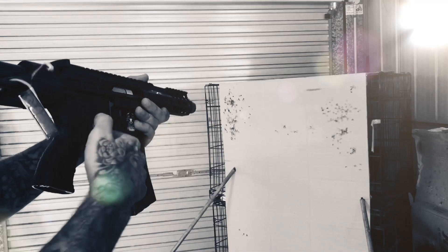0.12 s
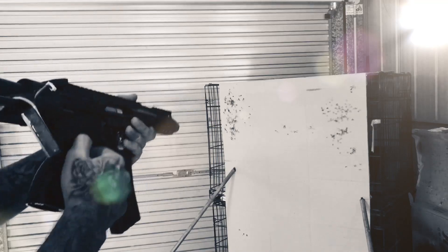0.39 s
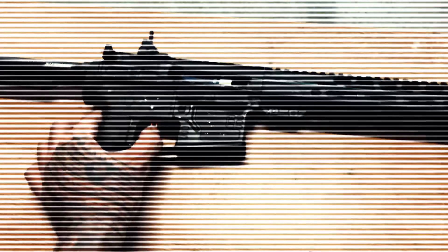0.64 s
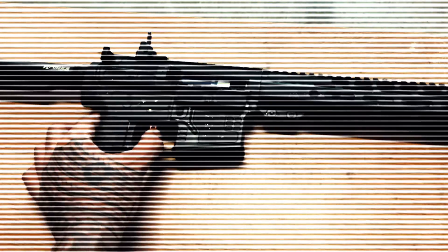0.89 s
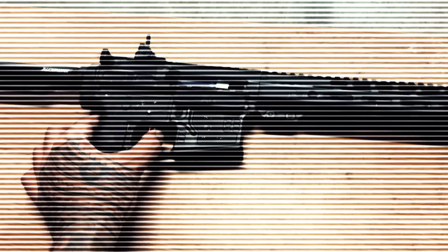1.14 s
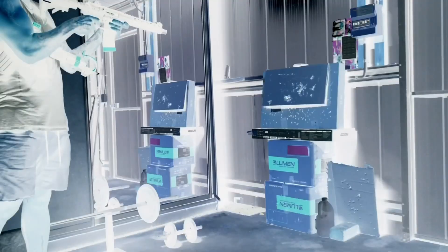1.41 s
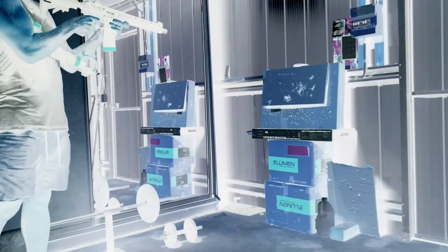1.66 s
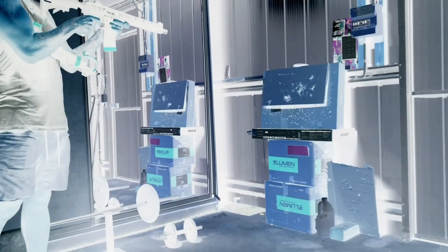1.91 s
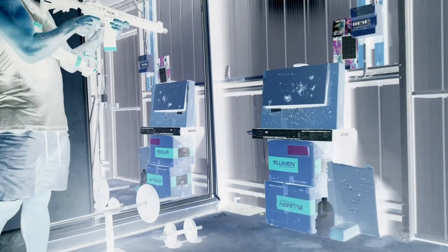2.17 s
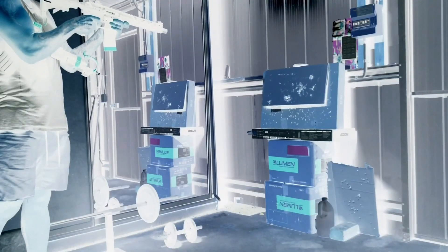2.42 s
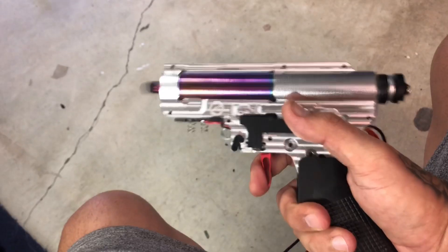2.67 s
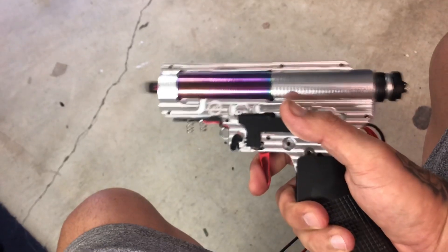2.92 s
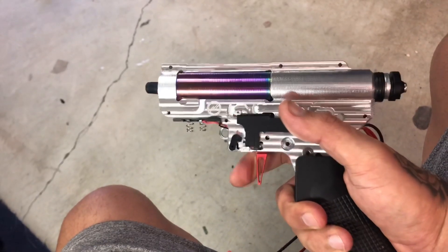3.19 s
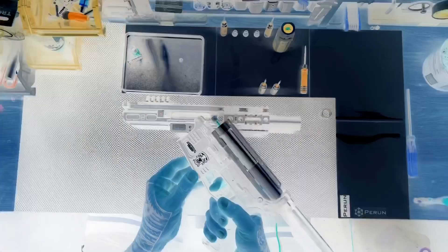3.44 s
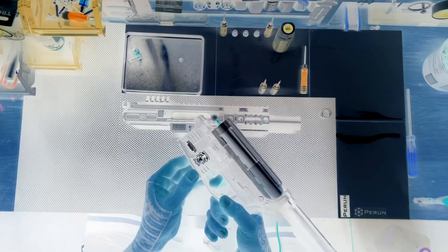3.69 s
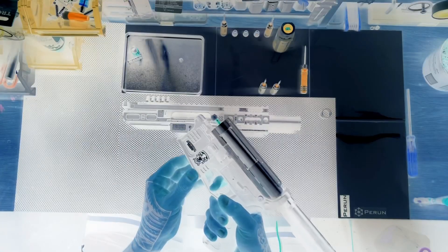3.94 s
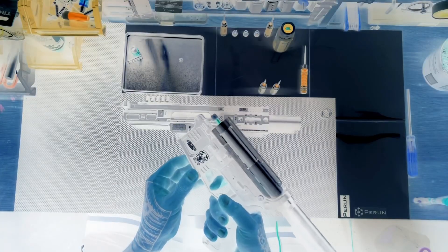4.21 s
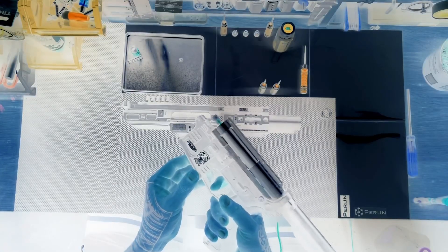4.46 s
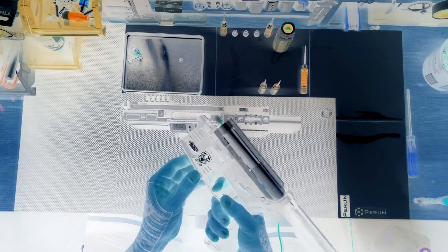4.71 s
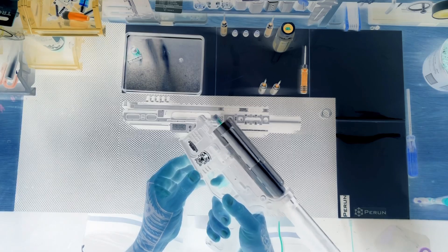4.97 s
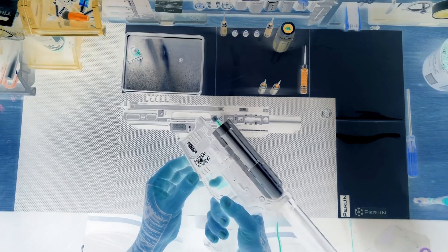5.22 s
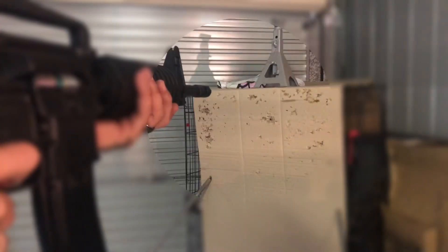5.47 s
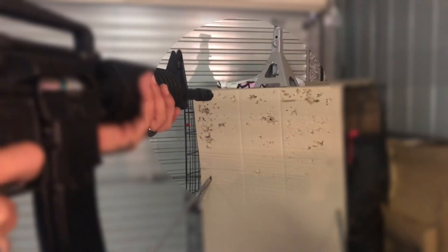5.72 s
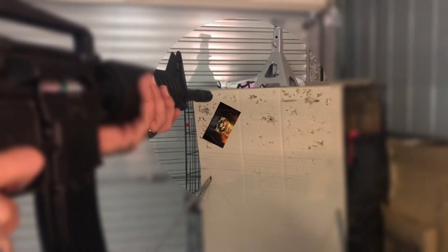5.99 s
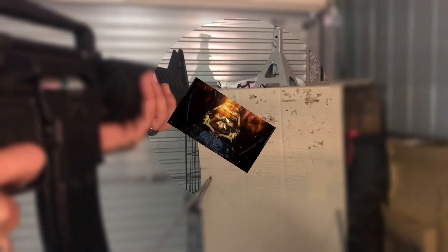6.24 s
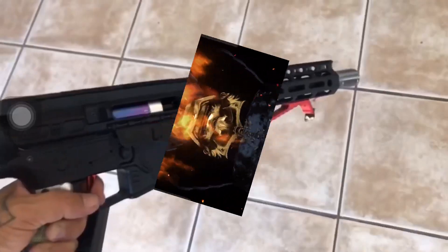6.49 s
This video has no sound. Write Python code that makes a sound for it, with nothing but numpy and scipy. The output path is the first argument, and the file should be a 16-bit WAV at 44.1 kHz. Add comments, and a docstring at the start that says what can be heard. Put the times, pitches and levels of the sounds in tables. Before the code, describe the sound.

Seven electric toy blasters follow one another in hard-walled sheds, very close to the microphone. A slower five-shot burst, a faster rattle, a long dense burst, another fast one, then about fifteen single shots and more bursts. Each cycle is a piston thud and airy crack, then a gear click and rough whirr. Echoes ring until abrupt cuts.

```python
"""Seven hard-walled sheds or garages, joined by hard cuts, an electric toy blaster in each, close to one microphone.
Every cycle the spring piston slams the cylinder head: a repeating thud under a partly new crack of air noise.
A gear catches the rack with a click and whirrs, as rough noise, while it draws the piston back.
In three of the rooms gel balls burst on cardboard as short noise cracks.
Decaying noise is each room's answer, which rings on after the last cycle until the next cut."""
import sys
import numpy as np
from scipy import signal
from scipy.fft import rfft, irfft, next_fast_len
from scipy.io import wavfile
from scipy.ndimage import uniform_filter1d

SR = 44100
rng = np.random.default_rng(int(sys.argv[2]) if len(sys.argv) > 2 else 0)


def volts_from_db(level):
    """Convert decibel levels to linear amplitude ratios."""
    exponent = np.asarray(level, float) / 20
    return 10 ** exponent


def pcm_store(signal):
    """Save signal as 16-bit PCM."""
    levels = np.round(np.clip(np.atleast_2d(signal), -1, 1) * 32767)
    wavfile.write(sys.argv[1], SR, levels.astype(np.int16).T)


N = 291942

# Each blaster's slam colour, as a list of points. Each point: frequency in Hz, relative level in dB per Hz.
SLAM_COLOURS = [
    [(50, -31), (119, -33), (237, 2), (316, -9), (407, -8), (628, -7), (809, -3.5), (1080, -4.5),
     (1610, -16), (1790, -24), (3440, 1), (4270, -6), (6130, -4), (15700, -15)],
    [(50, -46), (133, -29), (245, -18), (340, -13), (506, -8), (606, -11), (676, -1.5), (753, 0.5),
     (1500, -14.5), (1930, -1), (2310, -13), (3440, -25.5), (10900, -16.5), (15700, -20)],
    [(50, -14), (340, -7.5), (506, 2.5), (726, -12), (902, 0.5), (1120, -1), (1300, -19), (1550, -0.5),
     (1730, 5.5), (2150, -17), (2390, -26), (7620, -9), (9810, -18), (15700, -16)],
    [(50, -28), (407, -2.5), (726, -12.5), (870, 2.5), (1120, -7), (1340, 1.5), (1860, -13), (2770, -4),
     (3440, -10.5), (4120, -7), (5120, -13.5), (5700, -11), (6590, -12.5), (15700, -11)],
    [(50, -35), (184, -10), (454, -27.5), (1080, 1), (1440, -4), (1670, -0.5), (2150, -4.5), (3080, -2.5),
     (4270, -0.5), (4430, -8.5), (5700, 0.5), (6590, -4), (11300, -4.5), (15700, -5.5)],
    [(50, -30), (340, -2.5), (488, -8.5), (628, 1), (839, -13), (1080, -3), (1250, -21), (1500, -0.5),
     (1930, -19), (2230, -5), (2870, -2), (4120, -11), (8190, -12.5), (15700, -16)],
    [(50, -34), (177, -23), (340, -14.5), (471, -15.5), (606, 2), (700, 3), (809, -3), (970, -20),
     (1440, -14.5), (2000, -8), (2230, -9), (3200, -11.5), (3830, -15), (15700, -23)],
]
# Each blaster's piston blow. Each row: upper edge of the repeating thud in Hz, thud lag in ms, thud level in dB,
# crack rise in ms, crack T60 in ms, share of the crack's power alike at each blow (0-1), crack level in dB.
PISTON_BLOWS = [(1190, 2.47, 27, 2.5, 25, 0.48, 10.5), (2430, 0.79, 23, 1, 12.7, 0.47, 8),
                (705, 2.13, 18.5, 1.5, 40, 0.15, 4.5), (1610, 2.494, 18.5, 0.57, 29, .2, 5.5),
                (870, 3.62, 27, 2.3, 17, 0.96, 12.5), (3520, 1.082, 24, 0.44, 24, 0.6, 6),
                (1120, 0.66, 20.5, 1, 33, 0.55, 7)]
# Each blaster's single piston rebound. Each row: lag after the thud in ms, level in dB re the thud.
PISTON_REBOUNDS = [(2.4, -3.5), (2.51, -13), (2.9, -12), (2.36, -12.5), (2.02, -11), (2.78, -14.5),
                   (3.63, -11)]


def slam(k, size, s, db):
    """The piston's head thuds alike at each blow and rebounds once; above it the air crack is partly new noise."""
    thud_hz, lag_ms, thud_db, rise_ms, crack_ms, alike, crack_db = PISTON_BLOWS[k]
    rebound_ms, rebound_db = PISTON_REBOUNDS[k]
    low, high = split_at(thud_hz)
    thuds = impulses(size, s + lag_ms / 1e3, db + thud_db)
    thuds += impulses(size, s + (lag_ms + rebound_ms) / 1e3, db + thud_db + rebound_db)
    spikes = impulses(size, s, db + crack_db)
    envelope = contact(crack_ms, rise_ms)
    crack = np.sqrt(alike) * spread(spikes, pattern(envelope))
    crack += np.sqrt(1 - alike) * spread(spikes, envelope) * rng.standard_normal(size)
    return coloured(thuds, SLAM_COLOURS[k], low) + coloured(crack, SLAM_COLOURS[k], high)


# Each blaster's gear and shell colour, as a list of points. Each point: frequency in Hz, relative level in dB per Hz.
WHIRR_COLOURS = [
    [(50, -25.5), (191, -5.5), (264, -6), (316, -8), (726, -2.5), (870, -4.5), (1010, -3.5), (1440, -4),
     (1610, -4.5), (1860, -4.5), (3080, -14), (3560, -13), (4940, -9), (15700, -18)],
    [(50, -15), (138, -13), (340, -7), (438, -25), (585, -6), (700, -18), (781, -42), (1200, -9),
     (1930, -1), (2230, -9), (3200, -10.5), (3560, -13), (7620, -14.5), (15700, -29)],
    [(50, -34), (237, -4), (340, -11), (471, -2), (839, -3.5), (935, -5), (1440, -6.5), (1550, -6.5),
     (1670, -0.5), (2770, -12), (7620, -15.5), (8800, -22), (13600, -20.5), (15700, -21.5)],
    [(50, -28), (294, -41), (454, -28), (544, -20), (676, -14.5), (1040, -9.5), (1860, -19), (2070, -8),
     (2390, -5.5), (2770, -10), (3080, 3), (3830, -13), (4120, -12), (15700, -14.5)],
    [(50, -43), (138, -14), (254, -10), (294, -4), (488, -17.5), (628, -1.5), (781, -4), (970, -3.5),
     (1550, -2), (1730, 3), (2230, -4), (3560, 2.5), (4430, 0.5), (15700, -5.5)],
    [(50, -16), (128, -8.5), (264, -6), (365, -0.5), (422, -2.5), (488, 4.5), (585, -6), (1160, 0.5),
     (1730, -6), (2070, -2.5), (2770, -11), (4940, -8.5), (12600, -12), (15700, -12.5)],
    [(50, -38), (159, -23), (220, -34), (284, -5), (454, -27.5), (544, -4.5), (676, -7.5), (935, -8.5),
     (1080, -15), (1670, -17), (2000, -2), (2230, -30), (2570, -11.5), (15700, -24.5)],
]
# Each blaster's gears. Each row: click lag in ms, click level in dB, draw lag in ms, draw length in ms,
# draw level in dB, free-running motor level in dB, tooth roughness in dB rms, edge in Hz below which cycles are alike.
GEAR_CYCLES = [(24.25, 0, 21, 33, -3.5, -15.5, 6, 330), (15.73, -1, 18, 14, -1, -17.5, 2.5, 1930),
               (13.1, -5.5, 12, 21, -4, -7.5, 3, 280), (17.94, 2.5, 12, 13, -8.5, -13, 2, 1500),
               (16.5, 2, 16, 31, -4, -20, 0.8, 1900), (8.09, -0.5, 16.94, 22.7, -2.5, -13, 4.5, 177),
               (13.08, -6, 16, 16, -6, -12, 0, 2400)]


def gears(k, size, s, db):
    """The gear catches the rack with a click and grinds under spring load; the motor whirrs on between."""
    click_ms, click_db, lag_ms, draw_ms, draw_db, motor_db, rough_db, alike_hz = GEAR_CYCLES[k]
    click, catch, draw = (round(ms * SR / 1e3) for ms in (click_ms, lag_ms, draw_ms))
    cycle = np.full(catch + draw, volts_from_db(motor_db))
    cycle[catch:] += volts_from_db(draw_db) * signal.windows.tukey(draw, .35)
    cycle[click:] += volts_from_db(click_db) * contact(12, rise_ms=0.27)[:len(cycle) - click]
    spikes = impulses(size, s, db)
    teeth = volts_from_db(rough_db * unit(uniform_filter1d(rng.standard_normal(size), size=90)))
    fresh = spread(spikes, cycle) * unit(teeth * rng.standard_normal(size))
    # the first tooth strikes cleanly, a little early or late
    struck = s + (click_ms + .4 * rng.standard_normal(len(s))) / 1e3
    strike_db = db + click_db + 9.5 + 1.2 * rng.standard_normal(len(s))
    fresh += impulses(size, struck, strike_db)
    low, high = split_at(alike_hz)
    alike = spread(spikes, pattern(cycle))
    return coloured(alike, WHIRR_COLOURS[k], low) + coloured(fresh, WHIRR_COLOURS[k], high)


# Gel balls on cardboard. Each row: blaster (from 0), flight in ms, flight scatter in ms, level in dB re the slam,
# level scatter in dB.
BALLS = [(0, 25, 8, -7, 3), (2, 16, 8, -8, 3), (5, 22, 7, -5, 3)]
# Colour of a bursting ball. Each point: frequency in Hz, relative level in dB per Hz.
SPLAT_COLOUR = [(200, -18), (700, 2), (2500, -7), (6000, 5), (15700, -5)]


def splats(k, size, s, slam_db):
    """Each gel ball bursts after its flight: a short crack of noise off the cardboard."""
    out = np.zeros(size)
    for _, flight_ms, scatter_ms, splat_db, scatter_db in (row for row in BALLS if row[0] == k):
        chance = rng.standard_normal((len(s), 2))
        landed = s + (flight_ms + scatter_ms * chance[:, 0]) / 1e3
        hits = impulses(size, landed, slam_db + splat_db + scatter_db * chance[:, 1])
        cracks = spread(hits, contact(15, rise_ms=0.27)) * rng.standard_normal(size)
        out += coloured(cracks, SPLAT_COLOUR)
    return out


# Short shell rings, mid to bright, one list per blaster. Each row: frequency in Hz, T60 in s, lag in ms,
# level in dB re the draw whirr, scatter in dB.
SHELL_RINGS = [
    [],
    [(1930, .014, 1, 9, 1), (3200, .02, 6, -2, 3), (2500, .02, 6, -3, 3)],
    [(1715, .05, 10, -3, 4)],
    [(3180, .02, 15, 5, 1.5), (3050, .02, 19, 4, 1.5)],
    [(5750, .01, 3, 5, 2), (3650, .012, 3, 4, 2), (3600, .015, 18, 2, 2)],
    [(2400, .008, 1, 8, 1.5), (3000, .008, 1, 9, 1.5)],
    [(620, .03, 1, 4, 1), (780, .025, 1, 1, 1), (1950, .015, 1, 0, 2)],
]


def shell(k, size, s, whirr_db):
    """The shell rings as brief damped tones once a cycle."""
    out = np.zeros(size)
    for hz, t60, lag_ms, db, scatter_db in SHELL_RINGS[k]:
        blow_db = whirr_db + db + scatter_db * rng.standard_normal(len(s))
        out += spread(impulses(size, s + lag_ms / 1e3, blow_db), ring(hz, t60)[:SR // 5])
    return out


# Low damped tones once a cycle; in the fifth blaster a dull thump after the slam. Each row: blaster (from 0),
# frequency in Hz, T60 in s, lag in ms, level in dB re the slam, scatter in dB.
LOW_TONES = [(1, 248, .6, 3, -33, 1), (2, 245, .3, 3, -28, 3), (4, 60, .07, 20, -32, 6),
             (5, 137, .9, 3, -35, 3)]


def low_tones(k, size, s, slam_db):
    """Some blasters sound a low damped tone once a cycle, so short in the fifth that it is a dull thump."""
    out = np.zeros(size)
    for _, hz, t60, lag_ms, db, scatter_db in (row for row in LOW_TONES if row[0] == k):
        tone_db = slam_db + db + scatter_db * rng.standard_normal(len(s))
        out += spread(impulses(size, s + lag_ms / 1e3, tone_db), ring(hz, t60))
    return out


# The hum of a stopping motor. The one row: start in seconds, frequency in Hz, T60 in s, level in dB.
STOPPING_MOTOR = (.817, 388, .26, -23)


def stop_note():
    """The second blaster hums a short damped note as its motor stops."""
    s, hz, t60, db = STOPPING_MOTOR
    return spread(impulses(N, [s], [db]), ring(hz, t60))


# Automatic bursts. Each row: first shot in seconds, shots, cycle in ms at the start, cycle in ms at the end,
# extra length of the first cycle in ms, timing scatter in ms.
AUTO_BURSTS = [(.0257, 5, 48.5, 48.5, 1.7, .8), (.4862, 12, 28.27, 28.27, 0, .05),
               (1.2218, 36, 32.5, 30.45, 3, 1), (2.5041, 23, 28.85, 29.02, 1.7, .05),
               (4.6026, 9, 48.9, 48.9, 3.7, .1), (5.276, 12, 36.45, 36.45, 2.6, .3),
               (5.9134, 12, 36.6, 36.3, 2.65, .3), (6.3408, 11, 26.5, 26.68, 0, .05)]
# Strength of each burst. Each row: first slam in dB, settled slam in dB, draw whirr in dB, scatter in dB.
BURST_STRENGTHS = [(-9, -13, -15.5, 0.7), (-14, -17, -24, 1.5), (-13, -11, -12, 2), (-13, -19.5, -23, 0.9),
                   (-14, -11.5, -19, 3), (-15, -9.5, -15, 1.5), (-12.5, -12.2, -16, 0.6),
                   (-14.5, -17, -21, 0)]


def automatic_bursts():
    """While the trigger is held the cycles repeat, their pace drifting and their slams easing to a settled strength."""
    settle_s = 0.12
    last_draw_db = -0.5  # the trigger lifts during the last draw
    rows = []
    for timing, strength in zip(AUTO_BURSTS, BURST_STRENGTHS):
        first, count, early, late, slow, scatter_ms = timing
        first_db, settled_db, whirr_db, scatter_db = strength
        cycles = np.linspace(early, late, count - 1)
        cycles[0] += slow
        since = np.r_[0, np.cumsum(cycles)] / 1e3
        chance = rng.standard_normal((count, 3))
        at = first + since + scatter_ms / 1e3 * chance[:, 0]
        slam_db = settled_db + (first_db - settled_db) * np.exp(-since / settle_s) + scatter_db * chance[:, 1]
        draw_db = whirr_db + scatter_db * chance[:, 2] + last_draw_db * (since == since[-1])
        rows.append(np.c_[at, slam_db, draw_db])
    return np.concatenate(rows)


# Single trigger pulls, nearly alike. Each entry: start in seconds.
SINGLE_PULLS = [3.4626, 3.548, 3.6302, 3.7161, 3.7963, 3.8767, 3.9572, 4.0306, 4.111, 4.1655, 4.2446, 4.3,
                4.365, 4.4449, 4.5027]


def single_pulls():
    """Each pull of the trigger fires one cycle of nearly the same strength."""
    slam_db, whirr_db, scatter_db = -12.5, -19, 0.75
    chance = scatter_db * rng.standard_normal((len(SINGLE_PULLS), 2))
    return np.c_[SINGLE_PULLS, chance + [slam_db, whirr_db]]


# Weaker cycles: one slam caught at a cut, others around the end and start of bursts.
# Each row: start in seconds, slam in dB, draw whirr in dB.
WEAKER_CYCLES = [(3.414, -16.5, -17.5), (5.7161, -33, -22.5), (5.754, -26, -28), (5.829, -38, -22),
                 (5.862, -17.5, -18), (5.8794, -20, -20)]


def shots():
    """Every cycle in time order, weaker ones included: start in seconds, slam in dB, draw whirr in dB."""
    rows = np.concatenate([np.array(WEAKER_CYCLES), automatic_bursts(), single_pulls()])
    return rows[np.argsort(rows[:, 0])]


# The seven rooms. Each row: level in dB of the low answer (300 Hz), of the high answer (8 kHz),
# T60 in s at 200 Hz, at 2 kHz, at 12 kHz, edge in Hz below which the answer is steady.
ROOM_ANSWERS = [(3, -1, 0.95, 0.85, 0.31, 300), (-2.5, -2.5, 0.45, 0.96, 0.36, 1500),
                (-2, 3.5, 0.56, 0.61, 0.3, 300), (-6, -2, 1, 0.86, 0.33, 1400),
                (2.5, -2.5, 0.29, 1, 0.35, 60), (-5, 0.5, 0.99, 0.83, 0.1, 300),
                (-9, -2, 0.84, 0.49, 0.37, 1500)]


def room(k, x):
    """Each frequency dies at its own speed; the treble of the answer shifts as the hand moves the blaster."""
    low_db, high_db, t60_low, t60_mid, t60_high, steady_hz = ROOM_ANSWERS[k]
    count, turn_s = 4, .04  # tails taken in turn, seconds from one to the next
    hz, t, z = signal.stft(rng.standard_normal((count, SR)), SR, nperseg=256)
    z[:, hz < steady_hz] = z[0, hz < steady_hz]
    t60 = along([(200, t60_low), (2000, t60_mid), (12000, t60_high)], hz)[:, None]
    level = volts_from_db(along([(300, low_db), (8000, high_db)], hz))[:, None]
    level = level / np.sqrt(t60 * SR / (2 * np.log(1000)))  # a longer tail holds no more energy
    tails = signal.istft(z * level * volts_from_db(-60 * t / t60), SR, nperseg=256)[1]
    place = (np.arange(len(x)) / SR / turn_s) % count
    answer = 0
    for i, tail in enumerate(tails):
        away = np.abs((place - i + count / 2) % count - count / 2)
        delayed = np.pad(tail, (300, 0))  # the walls answer 300 samples late
        answer = answer + spread(x * np.clip(1 - away, 0, 1), delayed)
    return answer


# The cuts into each blaster's room. Each row: start in seconds, cycles already fired before the cut.
ROOM_CUTS = [(0, 6), (.478, 1), (1.1812, 9), (2.497, 1), (3.4135, 0), (5.2575, 1), (6.325, 9)]


def blaster(k, fired):
    """One blaster close up and its room behind, from its cut to the next."""
    lead = SR // 2  # samples played ahead of the cut, then dropped
    start, earlier = ROOM_CUTS[k]
    end = ROOM_CUTS[k + 1][0] if k + 1 < len(ROOM_CUTS) else N / SR
    size = round(end * SR) - round(start * SR) + lead
    s, slam_db, whirr_db = np.transpose([row for row in fired if start <= row[0] < end])
    # cycles fired before the cut still fill the room
    before = s[0] - (s[1] - s[0]) * np.arange(earlier, 0, -1)
    s = np.r_[before, s] - start + lead / SR
    slam_db, whirr_db = (np.pad(v, (earlier, 0), "edge") for v in (slam_db, whirr_db))
    near = slam(k, size, s, slam_db) + gears(k, size, s, whirr_db)
    near += low_tones(k, size, s, slam_db) + splats(k, size, s, slam_db)
    # heard close up, too brief to stand out in the room
    shell_rings = shell(k, size, s, whirr_db)
    return (near + shell_rings + room(k, near))[lead:]


def hush():
    """A faint, mostly low noise lies under everything."""
    return volts_from_db(-66) * coloured(rng.standard_normal(N), [(60, 13), (1500, -7), (6000, -40), (16000, -42)])


TOP_HZ = 15800  # nothing is kept above this


def unit(x):
    """x at rms 1."""
    return x / np.sqrt(np.mean(x ** 2) + 1e-20)


def along(points, hz):
    """(Hz, value) points read off on a log axis."""
    f, v = np.transpose(points)
    return np.interp(np.log(hz + 1), np.log(f + 1), v)


def coloured(x, spectrum, share=lambda hz: 1):
    """x through the causal filter of that spectrum, at mean power gain 1 before the share is taken."""
    m = 2 * next_fast_len(len(x) // 2 + 4096)
    hz = np.fft.rfftfreq(m, 1 / SR)
    gain = unit(volts_from_db(along(spectrum, hz)) * (hz < TOP_HZ)) * share(hz)
    # folding the cepstrum forward in time gives minimum phase
    cepstrum = irfft(np.log(gain + 1e-4), m)
    cepstrum[1:m // 2] *= 2
    cepstrum[m // 2 + 1:] = 0
    return irfft(rfft(x, m) * np.exp(rfft(cepstrum)), m)[:len(x)]


def split_at(cut_hz):
    """Gain of the part under cut_hz, and of the rest; their powers add to 1."""
    def low(hz):
        return 1 / np.sqrt(1 + (hz / cut_hz) ** 6)

    def high(hz):
        return np.sqrt(1 - low(hz) ** 2)
    return low, high


def impulses(size, seconds, db):
    """One spike per event."""
    at = np.round(np.asarray(seconds) * SR).astype(int)
    keep = (at >= 0) & (at < size)
    return np.bincount(at[keep], volts_from_db(db)[keep], size)


def spread(spikes, shape):
    """The shape laid down at every spike."""
    return signal.fftconvolve(spikes, shape)[:len(spikes)]


def contact(t60_ms, rise_ms):
    """Envelope of a short contact noise: a quick rise and an exponential decay."""
    ms = np.arange(SR // 10) / SR * 1e3
    return volts_from_db(-60 * ms / t60_ms) * (1 - np.exp(-ms / rise_ms))


def pattern(envelope):
    """A fixed flat-spectrum noise under the envelope: the same parts meet the same way each cycle."""
    envelope = np.pad(envelope, (0, 4096))
    x = envelope * rng.standard_normal(len(envelope))
    for _ in range(25):
        z = rfft(x)
        flat = irfft(z / np.abs(z), len(x)) * np.linalg.norm(envelope)
        # pull the flat noise back under the envelope
        x = flat * envelope / np.sqrt(np.abs(uniform_filter1d(flat ** 2, size=12)) + 1e-20)
    return flat


def ring(hz, t60):
    """A damped tone with a soft start."""
    t = np.arange(SR) / SR
    soft_start = 1 - np.exp(-t / min(.004, t60 / 20))
    return volts_from_db(-60 * t / t60) * np.sin(2 * np.pi * hz * t) * soft_start


def scene():
    """The blasters end to end, room after room, over the faint hush."""
    fired = shots()
    blasters = np.concatenate([blaster(k, fired) for k in range(len(ROOM_CUTS))])
    return (blasters + stop_note() + hush())[None]


# Brief dips in level. Each row: centre in seconds, depth in dB, length in ms (at its ends a sixth of the depth is left).
LEVEL_DIPS = [(1.363, -4, 27), (5.306, -12.5, 7.1), (5.403, -5.5, 7.8), (5.475, -7.5, 14), (5.889, -6, 14),
              (5.967, -0.5, 11), (6.077, -5, 9.4)]


def dips():
    """Gain of the brief, flat-bottomed dips in level."""
    t = np.arange(N) / SR
    return volts_from_db(sum(db * np.exp(-(2300.0 * (t - s) / ms) ** 4) for s, db, ms in LEVEL_DIPS))


def loudness_db(x, seconds):
    """Running power level with that time constant."""
    keep = np.exp(-1 / (seconds * SR))
    return 10 * np.log10(signal.lfilter([1 - keep], [1, -keep], x ** 2) + 1e-12)


def band_limit(x):
    """A steep low-pass at the top of the band."""
    return signal.sosfilt(signal.butter(12, 17100, fs=SR, output="sos"), x)


def record(dry):
    """A fast gain control ducks just after loud blows and lifts the tails; peaks round off softly."""
    ridden = dry * volts_from_db(-.3 * np.maximum(loudness_db(dry, 0.025) + 20.0, 0) + 1.5)
    # the quick stage acts late by its own time constant
    duck_s, duck_above_db, duck_share = 0.0048, -13, .3
    late = np.pad(loudness_db(ridden, duck_s), ((0, 0), (round(duck_s * SR), 0)), "edge")[:, :N]
    ridden = ridden * volts_from_db(-duck_share * np.maximum(late - duck_above_db, 0)) * dips()
    soft = ridden / (1 + np.abs(ridden / .98) ** 4) ** (1 / 4)
    hz = np.fft.rfftfreq(N, 1 / SR)
    low_cut = hz ** 2 / (hz ** 2 + 40 ** 2)
    finished = irfft(rfft(soft) * (hz < TOP_HZ) * low_cut, N)
    return band_limit(finished)


dry = scene()
out = record(dry)
pcm_store(out)
```